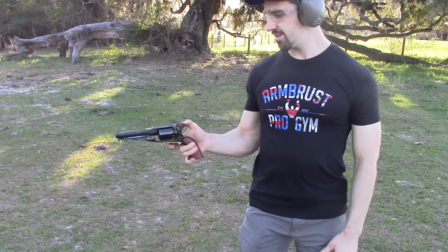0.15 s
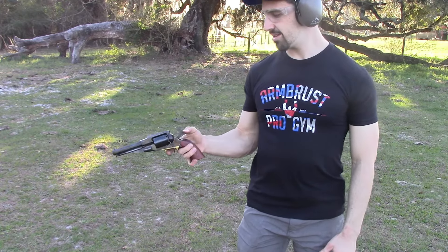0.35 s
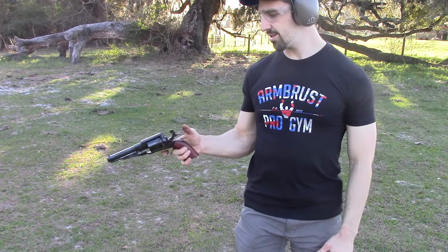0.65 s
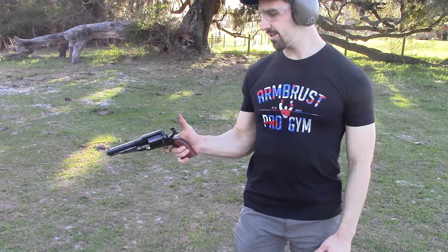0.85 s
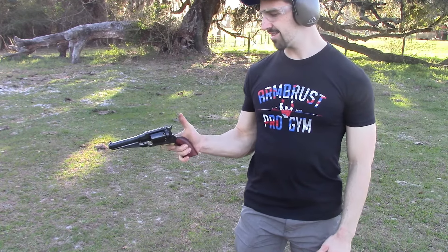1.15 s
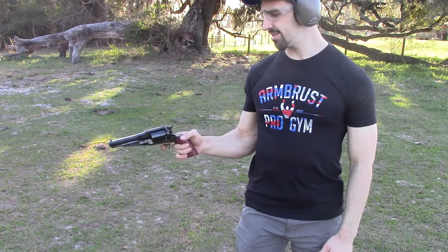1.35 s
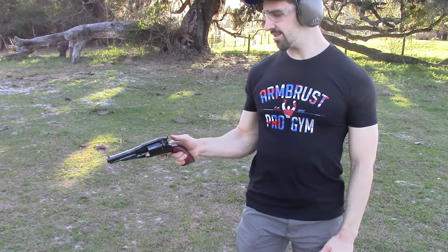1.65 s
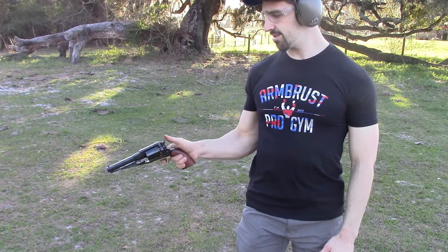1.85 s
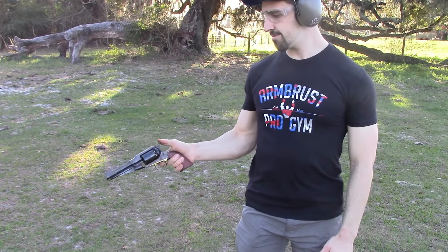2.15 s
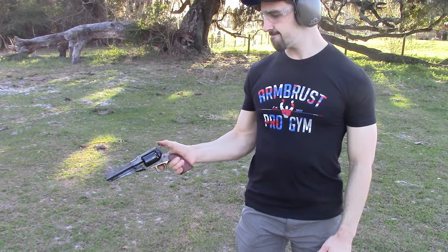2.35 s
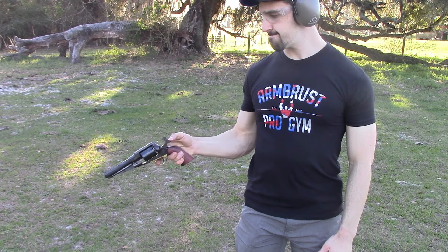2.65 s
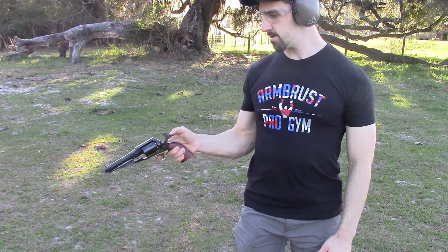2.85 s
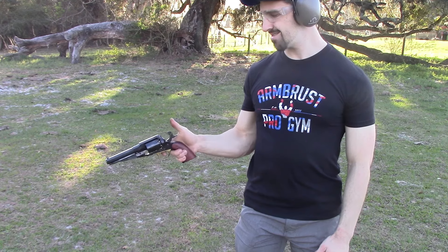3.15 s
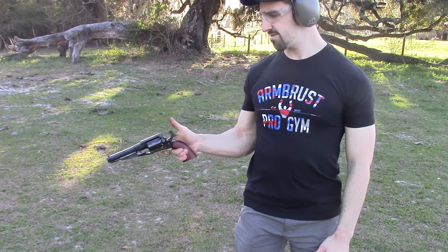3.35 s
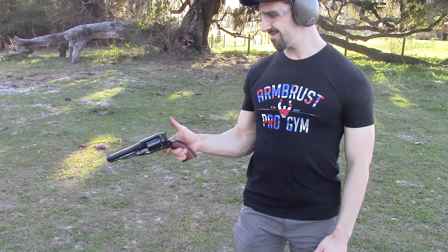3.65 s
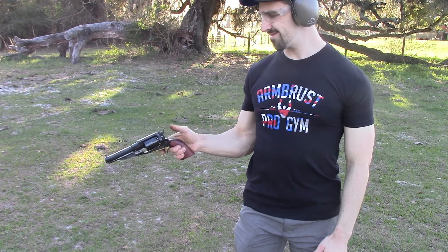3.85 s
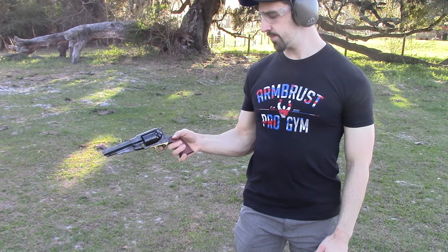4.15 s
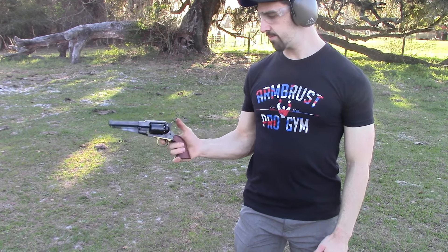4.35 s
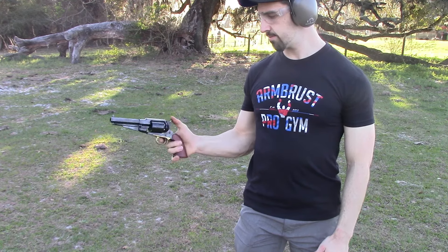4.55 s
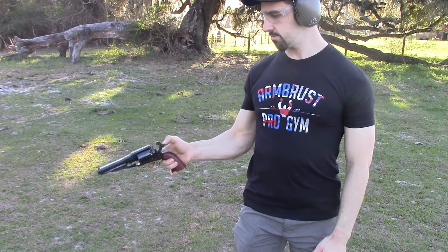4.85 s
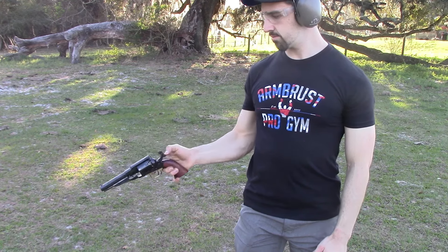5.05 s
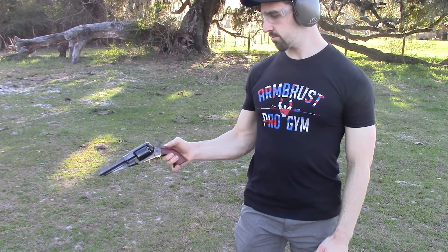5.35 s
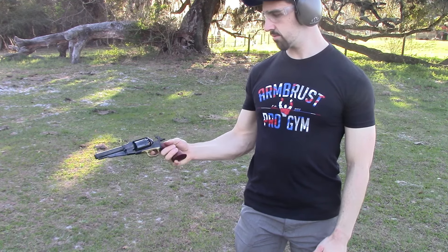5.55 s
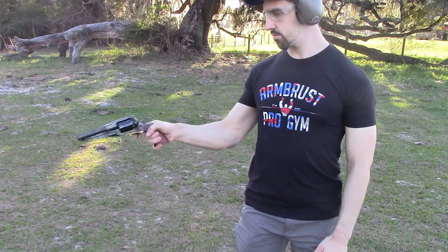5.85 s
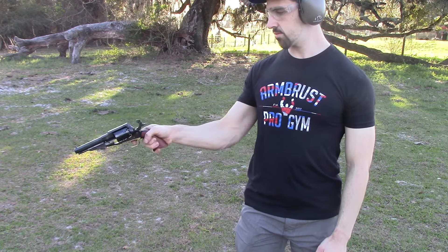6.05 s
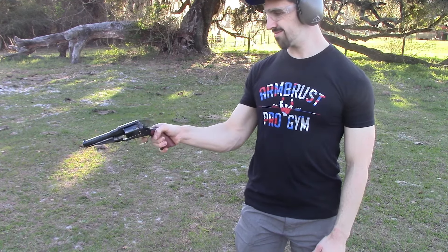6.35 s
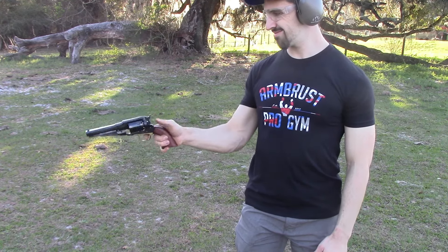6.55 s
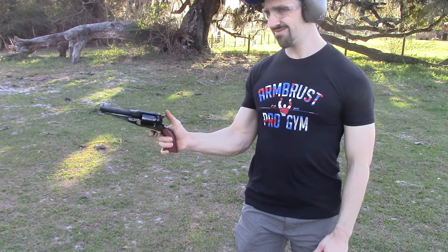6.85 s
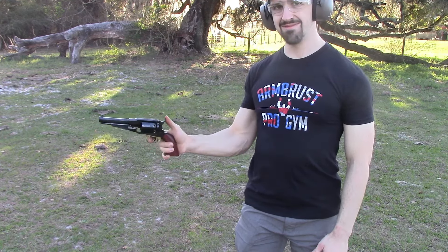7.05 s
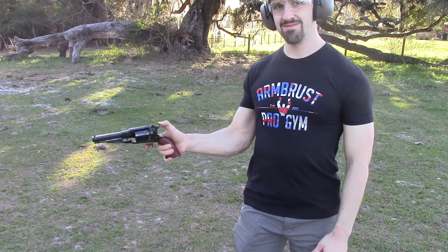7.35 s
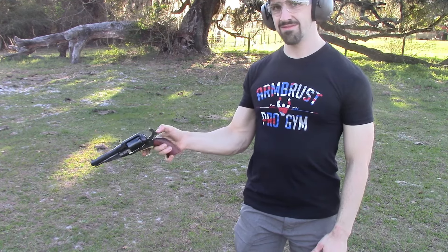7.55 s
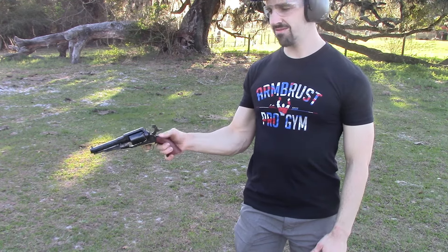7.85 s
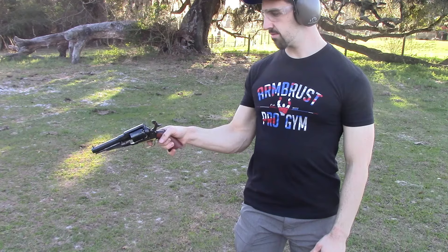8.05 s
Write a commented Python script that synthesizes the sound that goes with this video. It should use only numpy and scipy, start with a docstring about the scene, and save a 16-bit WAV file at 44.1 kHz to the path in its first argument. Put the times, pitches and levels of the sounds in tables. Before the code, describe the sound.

Outdoors in gusty wind, an empty revolver is cocked with crisp steel clicks and three percussion caps pop sharply, echoing off trees.

```python
"""Wind-driven pressure noise buffets a microphone over far traffic, an engine hum and two whines that soon fade out.
The lock of an empty revolver is cocked four times, its contacts exciting short steel modes; a small bird chips between.
Three percussion caps pop a few metres away: each is a noise crack plus a damped barrel resonance, overloads the input,
bounces off the ground and returns from the trees as decaying noise. After every pop all but the caps sinks a step."""
import sys
import numpy as np
from scipy import signal
from scipy.fft import rfft, irfft
from scipy.io import wavfile
from scipy.ndimage import uniform_filter1d

SR = 44100
rng = np.random.default_rng(int(sys.argv[2]) if len(sys.argv) > 2 else 0)


def ratio_of_db(decibels):
    """Turn decibels (scalar or array-like) into linear amplitude factors; 0 dB maps to 1."""
    return 10 ** (np.asarray(decibels, float) / 20)


def digitize_waveform(pressure):
    """Quantize a signal to 16-bit integers and store it at the path in sys.argv[1].

    Rows of a 2-D input are taken as channels; values are limited to [-1, 1].
    """
    field = np.atleast_2d(pressure).T
    bounded = np.clip(field, -1, 1)
    quanta = np.round(bounded * 32767).astype(np.int16)
    wavfile.write(sys.argv[1], SR, quanta)


N = 361752  # samples, 8.2 s

# Stereo width of noise. Each row: frequency in Hz, side over mid in dB before any narrowing.
STEREO_WIDTH = [(300, -37.5), (1300, -25.5), (2400, -11), (4400, -3), (8000, -2), (16000, -2.5)]

# Strength of the wind before its random lurching. Each row: time in seconds, level in dB.
WIND_LEVEL = [(0, -36.5), (.32, -33), (.68, -33.5), (1.0, -38), (1.42, -27), (1.7, -34), (1.94, -40),
              (2.2, -36.5), (2.85, -32.5), (3.15, -37), (3.5, -40), (3.81, -41), (4.32, -34.5),
              (4.59, -39.5), (5.09, -34.5), (6.28, -42.5), (6.67, -45.5), (7.17, -45), (7.9, -40.5)]
# Spectrum of the buffeting. Each row: frequency in Hz, relative density in dB per Hz.
BUFFET_SPECTRUM = [(15, -48.5), (25, -16), (108, 4), (257, -6.5), (365, -19), (409, -18), (452, -30.5),
                   (500, -25), (650, -49.5), (1100, -120)]
# Strongest gusts that thump the microphone. Each row: start in seconds, level in dB before decay.
GUST_THUMPS = [(.357, -11), (.634, -18.5), (.699, -20), (1.319, -15), (1.519, -14.5), (1.883, -14),
               (2.142, -21.5), (2.233, -18.5), (2.485, -21), (2.899, -24)]
# Weaker thumps at random times: how many, and their least level in dB over the wind
THUMP_COUNT, THUMP_DB = 16, 4

# Spectrum of far traffic and leaves. Each row: frequency in Hz, relative density in dB per Hz.
FIELD_SPECTRUM = [(200, -10), (300, -12), (560, -1.5), (800, -3.5), (1400, -13.5), (2400, -19.5),
                  (4400, -29), (7100, -34), (11300, -40), (16000, -50)]
# Their strength before the swaying. Each row: time in seconds, level in dB.
TRAFFIC_LEVEL = [(0, -41), (1.0, -43.5), (3.5, -46), (4.6, -45), (5.3, -48.5), (6.3, -49), (8.2, -47.5)]
# Far engine before its wavering. Each row: time in seconds, hum in Hz, level in dB,
# lower octave over the hum in dB.
ENGINE_HUM = [(0, 122, -45, -8), (2.7, 123.2, -43, -8), (3.57, 124.2, -39.5, -10), (4.7, 126.5, -43.5, -8),
              (5.2, 140, -48, -6), (6.3, 137.7, -44.5, -6), (6.7, 137.6, -48, -8), (7.2, 138, -46, 0),
              (8.2, 140.7, -44, -2)]
# Thin far whines before their wavering. Each row: frequency in Hz, level in dB, end in seconds.
FAR_WHINES = [(562, -48, 0.9), (665, -47, 0.65)]

# Modes of the lock's steel, before random spread. Each row: frequency in Hz, relative level in dB,
# 60 dB decay time in seconds.
STEEL_MODES = [(2650, -8.5, .009), (2950, -4, .011), (3430, -7, 0.007), (4100, -11, 0.0047),
               (4900, -9, .004), (6040, -6, 0.0099), (6800, 1.5, 0.0062), (7624, -3, 0.0045),
               (8160, -16, 0.024), (8700, -8.5, 0.0032), (9620, 2.5, .005), (11000, -5.5, 0.0059),
               (12800, -8.5, 0.0045), (14200, -8, .004)]
# Cockings. Each row: full cock in seconds, its rattle in seconds, lead of the thumb, of the half cock
# and of the bolt in seconds, delay of the finger on the trigger in seconds, finger level in dB.
COCKINGS = [(.3954, .0028, .1440, .0600, .0046, .1890, 2), (2.6515, .010, .1045, .0597, .0048, .1765, -3),
            (4.9452, .004, .0917, .0556, .0087, .2545, -9), (7.5470, .003, .0786, .0430, .0033, .1838, 1)]
# Contacts of the lock. Each tuple: peak in dB, low modes in dB, spring ring in dB, blow in seconds,
# rattle in seconds (that of FULL stands with each cocking).
TAKE_UP, THUMB, HALF = (-34, 13, 0, .0025, .004), (-29, 5, 15, .0005, .002), (-8.5, -7, 0, .002, .003)
DRAG, BOLT, FULL = (-33, -2, 0, .0008, .002), (-6.5, -6, 0, .0006, .002), (1.5, 3, 0, .0005)
TOUCH, SLACK, FALL = (-33, -3, 0, .0005, .002), (-29, 2, 0, .0012, .003), (-10, -9, 0, .0015, .003)
TAKE_UP_S, TOUCH_S, FALL_S = .0105, .007, .0056  # seconds before thumb click, trigger slack and pop
DRAG_SHARE = .41  # of the half cock lead

# Bird. Each row: start in seconds, first frequency in Hz, last frequency in Hz, peak in dB.
BIRD_CHIPS = [(.671, 7340, 7540, -51), (3.34, 7500, 7300, -62), (5.825, 6850, 7200, -61.5),
              (8.109, 7200, 7260, -61)]
CHIP_S = .027  # length in seconds

# Caps before the input overloads. Each row: start in seconds, blast in dB, initial barrel frequency in Hz,
# time scale of its sag in seconds, crack in dB, nearby scatter in dB, echo in dB.
CAP_POPS = [(1.0196, 8, 480, 0.0016, 14, -7.5, -17), (3.5807, 12, 430, 0.0066, 17, -11, -29),
            (6.3898, 6.5, 402.1, 0.0023, 9, -14.5, -42)]
# Spectrum of scatter from close by. Each row: frequency in Hz, relative density in dB per Hz.
NEARBY_SPECTRUM = [(150, -14), (330, -12), (620, 3), (1000, 0), (1500, -4.5), (2500, 4.5), (5000, -6.5),
                   (9000, -11.5), (15000, -22)]
# The wood as a whole, before the echo envelope. Each row: frequency in Hz, relative level in dB,
# 60 dB decay time in seconds.
WOOD_DECAY = [(317, -19.5, 0.61), (690, -11.5, 1.9), (1510, -9.5, 1.7), (3024, -4.5, 1.67),
              (4014, -4, 1.25), (4800, -8.5, 1.05), (7500, -7.5, 0.67), (10500, -12.5, 0.6),
              (13900, -17, 0.34)]
# Stands of trees that throw the pop back. Each row: delay in seconds, relative level in dB,
# length in seconds.
TREE_STANDS = [(.0700, 0, .006), (.108, 0.5, .060), (.215, -4.5, .10)]
RISE_SHARE, FALL_OFF_S = .3, .018  # rise as a share of the length; time constant of the power in seconds
# Scatter between the stands in dB, its slope in dB per second, its build-up in seconds,
# and the level in dB before the first stand
SCATTER_DB, SCATTER_DB_PER_S, BUILD_S, BEFORE_DB = -1.5, -2.5, .16, -20
# Lone hard surfaces. Each row: delay in seconds, level over the echoes in dB, strongest frequency in Hz.
HARD_SLAPS = [(.0703, 4, 3900), (.325, -17.5, 8890), (.384, -20, 2700)]
SINK_DB, SINK_S = [-1.5, -12, -9.5], .03  # step in dB after each pop, and its length in seconds


def add(out, x, s):
    """Superposition: mix x into out at time s."""
    i = int(s * SR)
    out[..., i:i + x.shape[-1]] += x[..., :N - i]


def colour(x, table):
    """Linear filtering: weight the spectrum by (Hz, dB) points, with -70 dB below the first."""
    hz, db = np.transpose(table)
    f = np.maximum(np.fft.rfftfreq(x.shape[-1], 1 / SR), 1)
    gain = ratio_of_db(np.interp(np.log(f), np.log(hz), db, left=-70))
    return irfft(rfft(x) * gain, x.shape[-1])


def unit(x):
    """Normalisation: scale to rms 1."""
    return x / np.sqrt(np.mean(x ** 2))


def curve(table):
    """Envelope: gain along time from (s, dB) rows."""
    return ratio_of_db(np.interp(np.arange(N) / SR, *np.transpose(table)))


def wide(size, narrow_db=0):
    """Spatial coherence: noise on two close ports is alike in the bass and unrelated in the treble."""
    mid, side = rng.standard_normal((2, size))
    return mid + ratio_of_db(narrow_db) * colour(side, STEREO_WIDTH) * np.array([[1], [-1]])


def walk(rate):
    """Slow random modulation: levels held 1 / rate seconds and smoothed twice; spread near 1."""
    k = int(SR / rate)
    held = np.repeat(rng.standard_normal(N // k + 1), k)
    return 1.3 * uniform_filter1d(uniform_filter1d(held, k), k)[:N]


def wind():
    """Turbulent pressure at the microphone: lurching low noise, and gusts as damped 190 Hz thumps."""
    level = curve(WIND_LEVEL)
    out = unit(colour(rng.standard_normal(N), BUFFET_SPECTRUM)) * ratio_of_db(2.4 * walk(30)) * level
    t = np.arange(int(.03 * SR)) / SR
    thump = np.sin(2 * np.pi * 190 * t) * np.exp(-t / 0.0059)
    for s, db in GUST_THUMPS:
        add(out, ratio_of_db(db) * thump, s)
    for where, size in rng.random((THUMP_COUNT, 2)):
        weak = ratio_of_db(THUMP_DB + 6 * size) * level[int(where * N)] * thump
        add(out, weak, where * N / SR)
    return out


def field():
    """Many unrelated far sources sum to noise: traffic and leaves, swaying a little."""
    return unit(colour(wide(N), FIELD_SPECTRUM)) * ratio_of_db(1.0 * walk(4)) * curve(TRAFFIC_LEVEL)


def drone():
    """Harmonic radiation of a far engine: a wavering hum with the octaves below and above."""
    s, hz, db, low_db = np.transpose(ENGINE_HUM)
    wavering_hz = np.interp(np.arange(N) / SR, s, hz) * (1 + .012 * walk(8.5))
    phase = 2 * np.pi * np.cumsum(wavering_hz) / SR
    low = curve(np.transpose([s, low_db])) * np.sin(phase / 2) * ratio_of_db(2.5 * walk(11))
    high = ratio_of_db(-13) * np.sin(2 * phase) * ratio_of_db(3.0 * walk(9))
    hum = np.sin(phase) * ratio_of_db(3.5 * walk(8)) + low + high
    return hum * curve(np.transpose([s, db]))


def whines():
    """Pure tones with random frequency and amplitude modulation: far machinery that fades out."""
    t = np.arange(N) / SR
    out = np.zeros(N)
    for hz, db, end in FAR_WHINES:
        level = ratio_of_db(db + 2.6 * walk(6.1)) * np.clip((end - t) / 0.23, 0, 1)
        phase = 2 * np.pi * np.cumsum(hz * (1 + 0.0092 * walk(15))) / SR
        out += level * np.sin(phase)
    return out


def contacts():
    """Impact sequence as (s, extra dB, part): eight contacts per cocking, one as the hammer falls."""
    rows = [(cap[0] - FALL_S, 0, FALL) for cap in CAP_POPS]
    for s, rattle_s, thumb, half, bolt, trigger, finger_db in COCKINGS:
        steps = [(thumb + TAKE_UP_S, TAKE_UP), (thumb, THUMB), (half, HALF), (DRAG_SHARE * half, DRAG),
                 (bolt, BOLT), (0, FULL + (rattle_s,))]
        rows += [(s - lead, 0, part) for lead, part in steps]
        rows += [(s + trigger - TOUCH_S, finger_db, TOUCH), (s + trigger, finger_db, SLACK)]
    return rows


def lock():
    """Modal excitation: rattling contacts ring the steel in varying shares and reflect off the ground."""
    out, t = np.zeros((2, N)), np.arange(int(.06 * SR)) / SR
    hz, db, t60 = np.transpose(STEEL_MODES)[:, :, None]
    thin = signal.butter(6, 2450, "highpass", fs=SR, output="sos")
    for s, extra_db, (part_db, low_db, spring_db, blow_s, rattle_s) in contacts():
        # the longest-ringing mode is the spring
        share = db + low_db * (hz < 4500) + spring_db * (t60 > .02) + 2.0 * rng.standard_normal(hz.shape)
        phase = 2 * np.pi * hz * (1 + .02 * rng.standard_normal(hz.shape)) * t
        ring = np.sum(ratio_of_db(share - 60 * t / t60) * np.sin(phase), axis=0)
        blow = t / blow_s * np.exp(1 - 2 * t / blow_s) * 2
        rattle = wide(len(t), narrow_db=-6) * (blow + ratio_of_db(-18) * np.exp(-t / rattle_s))
        click = signal.sosfilt(thin, signal.fftconvolve(ring[None], rattle, axes=1))
        click = click + ratio_of_db(-11) * np.roll(click, int(.0030 * SR), axis=1)  # ground reflection
        add(out, click / np.max(np.abs(click)) * ratio_of_db(extra_db + part_db), s)
    return out


def bird():
    """Frequency glide: thin chips, each a sine sweeping linearly under a smooth envelope."""
    out = np.zeros(N)
    for s, hz0, hz1, db in BIRD_CHIPS:
        hz = np.linspace(hz0, hz1, int(CHIP_S * SR))
        chip = np.hanning(len(hz)) * np.sin(2 * np.pi * np.cumsum(hz) / SR)
        add(out, ratio_of_db(db) * chip, s)
    return out


def pop(blast_db, barrel_hz, sag, crack_db, nearby_db):
    """Impulsive jet and pipe resonance: crack, slow puff from the barrel, ground bounce, near scatter."""
    t = np.arange(int(.08 * SR)) / SR
    jet = colour(wide(len(t), narrow_db=-3.5), [(1000, -16.5), (4000, -2), (8000, 3), (16000, -8)])
    # the flash at the nipple, then gas leaving the muzzle a moment later
    flash = np.exp(-(t / .0006) ** 4)
    muzzle = ratio_of_db(-12) * np.exp(-((t - .0016) / .0003) ** 2)
    crack = unit(jet) * (flash + muzzle)
    # the barrel swings like an open pipe, suction first, slowing as the gas cools
    blast = -np.sin(2 * np.pi * barrel_hz * sag * np.log(1 + t / sag)) * np.exp(-t / 0.0016)
    snap = np.sin(2 * np.pi * 1800 * t) * np.exp(-t / .0006)
    # the puff comes back off the turf as a slow suction
    slump = np.sin(np.pi * np.clip(t / .004, 0, 1)) ** 2
    lag = int(.0042 * SR)
    bounce = ratio_of_db(crack_db - 22.5) * crack - ratio_of_db(1.5) * snap - ratio_of_db(-14) * slump
    ground = np.roll(bounce, lag, axis=-1) * (t >= lag / SR)
    patchy = ratio_of_db(3.0 * np.repeat(rng.standard_normal(len(t) // 64 + 1), 64)[:len(t)])
    fade = np.exp(-t / .003) + ratio_of_db(-5) * np.exp(-t / .014)
    nearby = unit(colour(wide(len(t), narrow_db=-2), NEARBY_SPECTRUM)) * patchy * fade
    return ratio_of_db(crack_db) * crack + ratio_of_db(blast_db) * blast + ground + ratio_of_db(nearby_db) * nearby


def trees(t):
    """Multiple scattering: over a building diffuse field, each stand's echo swells, holds and falls off."""
    first = TREE_STANDS[0][0]
    built = 1 - np.exp(-np.maximum(t - first, 0) / BUILD_S)
    before = ratio_of_db(BEFORE_DB) ** 2 * np.clip(2 * t / first - 1, 0, 1)
    power = before + ratio_of_db(SCATTER_DB + SCATTER_DB_PER_S * t) ** 2 * built
    for s, db, length in TREE_STANDS:
        rise = np.clip((t - s) / (RISE_SHARE * length), 0, 1)
        fall = np.exp(-np.maximum(t - s - length, 0) / FALL_OFF_S)
        power = power + ratio_of_db(db) ** 2 * rise * fall
    return np.sqrt(power)


def woods():
    """Frequency-dependent decay: one pop's waves of echoes lose their treble first; hard surfaces slap."""
    t = np.arange(int(1.8 * SR)) / SR
    grain = ratio_of_db(2.3 * np.repeat(rng.standard_normal(len(t) // 132 + 1), 132)[:len(t)])
    hz, when, z = signal.stft(wide(len(t)) * grain, SR, nperseg=128)
    at, db, t60 = np.transpose(WOOD_DECAY)
    db, t60 = (np.interp(np.log(hz + 1), np.log(at), c)[:, None] for c in (db, t60))
    out = signal.istft(z * ratio_of_db(db - 60 * when / t60), SR, nperseg=128)[1][:, :len(t)]
    out = out / np.std(out[:, :SR // 5]) * trees(t)
    for s, db, hz in HARD_SLAPS:
        band = [(hz / 2, -20), (hz, 0), (hz * 1.7, -20), (hz * 3, -50)]
        slap = unit(colour(wide(512), band)) * np.exp(-t[:512] / .002)
        add(out, ratio_of_db(db) * slap, s)
    return out


def caps():
    """Direct sound and reverberation: each pop and its answer from the trees."""
    out = np.zeros((2, N))
    for s, *charge, echo_db in CAP_POPS:
        add(out, pop(*charge), s)
        add(out, ratio_of_db(echo_db) * woods(), s)
    return out


def sinking():
    """Gain change: a ramp down in dB from each pop, each step adding to the last."""
    t = np.arange(N) / SR
    return ratio_of_db(sum(db * np.clip((t - cap[0]) / SINK_S, 0, 1) for cap, db in zip(CAP_POPS, SINK_DB)))


def scene():
    """Superposition at the microphone: the caps at full level, all else under the sinking gain."""
    others = wind() + field() + drone() + whines() + lock() + bird()
    return caps() + sinking() * others


def roll_off(x):
    """The treble ends steeply here."""
    return signal.sosfilt(signal.butter(12, 16510, fs=SR, output="sos"), x)


def record(dry):
    """Amplitude saturation and band limiting: peaks flatten, deepest bass and top go, faint hiss joins."""
    top = .72  # limit of the input, full scale 1
    clipped = top * dry / (top ** 6 + dry ** 6) ** (1 / 6)
    x = signal.sosfilt(signal.butter(1, 40, "highpass", fs=SR, output="sos"), clipped)
    x = signal.sosfilt(signal.butter(8, 15800, fs=SR, output="sos"), x)
    x = x + ratio_of_db(-88.5) * rng.standard_normal(x.shape)  # hiss
    return roll_off(np.clip(x, -1, 1))


dry = scene()
out = record(dry)
digitize_waveform(out)
```